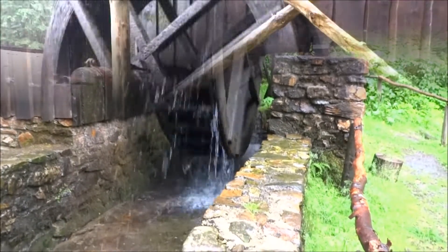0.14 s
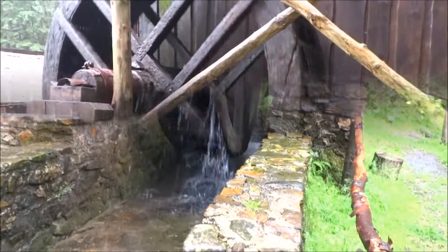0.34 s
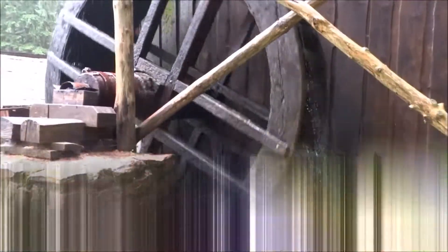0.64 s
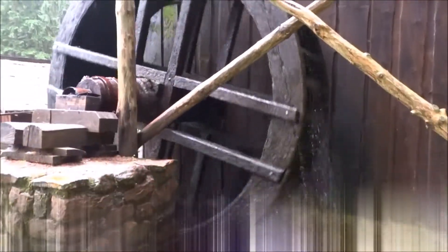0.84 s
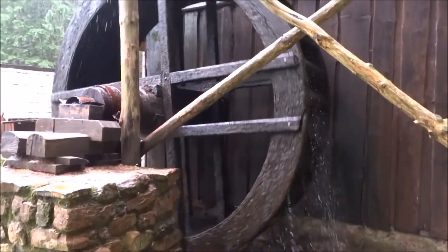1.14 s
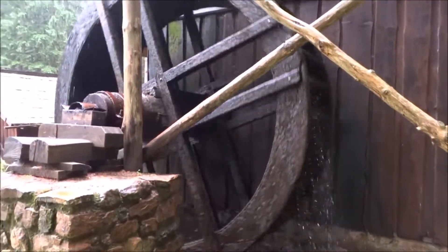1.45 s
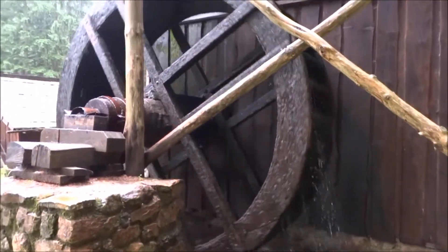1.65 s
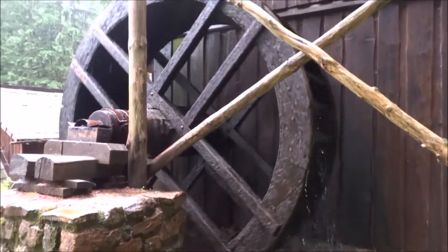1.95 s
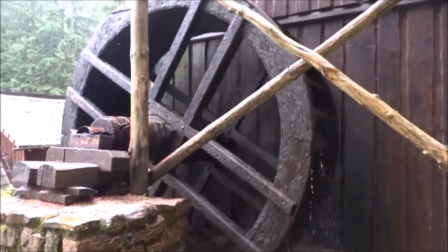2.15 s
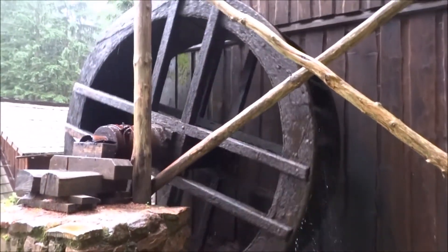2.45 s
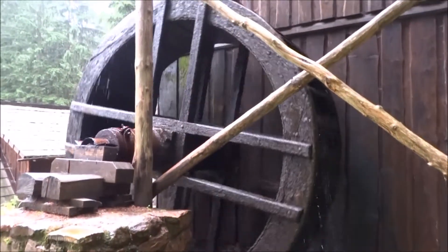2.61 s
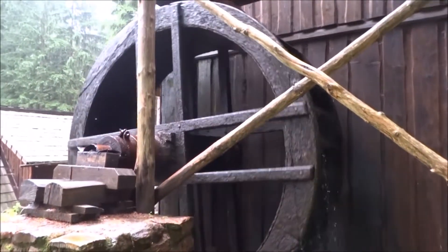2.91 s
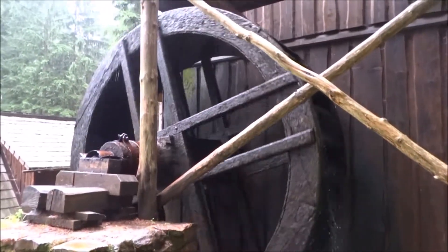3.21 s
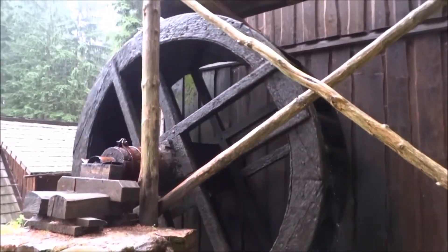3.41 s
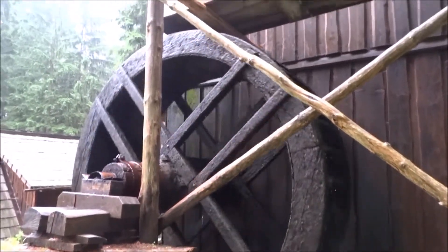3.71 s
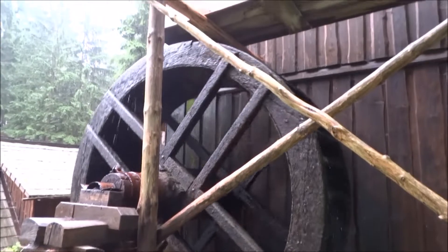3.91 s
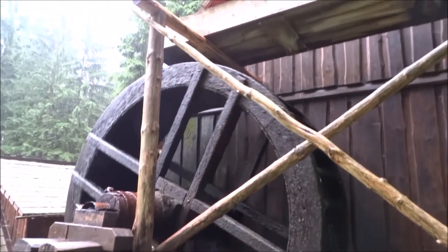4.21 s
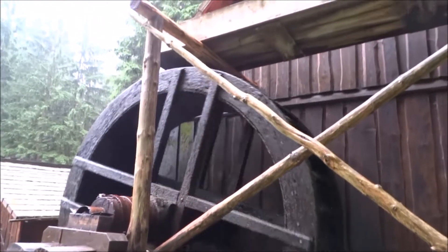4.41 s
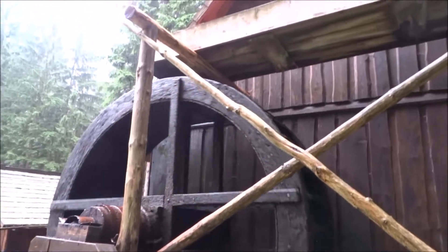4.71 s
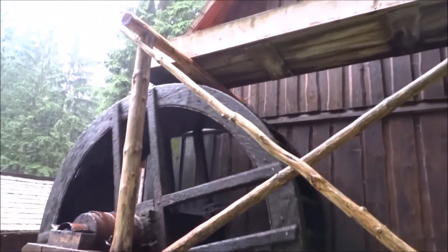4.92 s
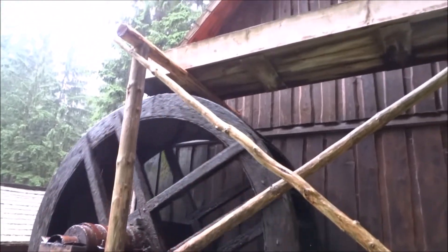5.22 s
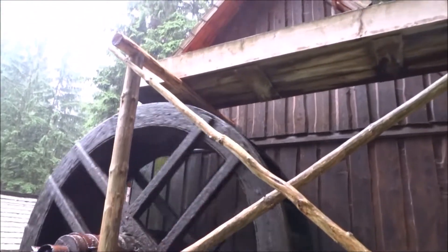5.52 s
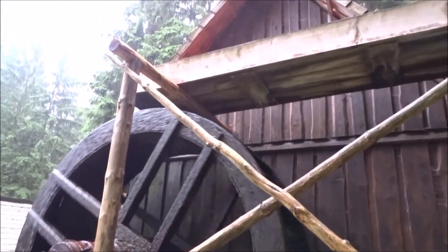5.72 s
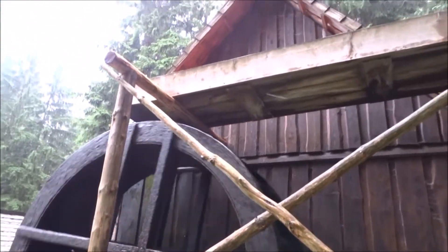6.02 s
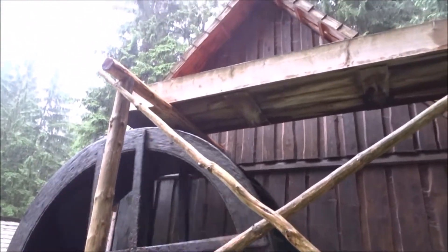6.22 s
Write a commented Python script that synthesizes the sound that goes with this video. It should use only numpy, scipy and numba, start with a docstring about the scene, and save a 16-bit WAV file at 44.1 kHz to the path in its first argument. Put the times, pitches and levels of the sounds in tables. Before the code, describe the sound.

A big wooden water wheel turns outdoors, water pouring off it into a stone channel a few metres from the microphone. Throughout there is a dense, bright rush of foam, drop ticks, trickles and gurgles, mostly central with slight stereo width. From about 0.2 s a heavier second fall fades in with deep rumble and several clear bubble plops, holding until it cuts off near 0.66 s; the rumble tails away after. Low thuds follow around 0.8 and 1.3 s. The flow eases from 1.5 to 3 s, with a high bubble blip at 2.1 s. From 3.5 s it swells in waves, with splashes at 4.2, 4.4 and strongest at 4.6 s, then a rising gulp at 4.76 s. Dull wooden gear thumps run beneath at ten per second, one hard knock near 5.8 s. The sound grows fuller and less crisp, still pouring at the end, 6.35 s.

```python
"""Water spills off the buckets of a big wooden water wheel into a stone race, a few metres away. The fall is
coloured foam noise, drop ticks and bubble clouds; near the start a louder layer of water sound fades in, holds
and cuts off abruptly. Low band noise makes the rumble and thuds; noise bursts and rising sines make the
splashes, bubbles and gulps that stand out. Under the water, wooden gearing thumps about ten times a second:
each tooth rings the damped modes of a timber frame."""
import sys
import numpy as np
from scipy import signal
from scipy.fft import rfft, irfft
from scipy.io import wavfile
from scipy.ndimage import uniform_filter1d
from numba import njit

SR = 44100
rng = np.random.default_rng(int(sys.argv[2]) if len(sys.argv) > 2 else 0)


def unload_wav(signal):
    """Save mono or channel-first audio to the path in sys.argv[1] as 16-bit WAV at rate SR, clipped to [-1, 1]."""
    wavfile.write(
        sys.argv[1],
        SR,
        np.round(np.clip(np.atleast_2d(signal).T, -1, 1) * 32767).astype(np.int16),
    )


N = 280024
T = np.arange(N) / SR  # s
FREQ = np.arange(N // 2 + 1) * SR / N + 1e-3  # Hz, offset so that its log exists


def undb(db):
    """Decibels to gain."""
    return 10 ** (np.asarray(db) / 20)


def unit(x):
    """Scale to rms 1."""
    return x / np.sqrt(np.mean(x ** 2))


def over_hz(points, hz=FREQ):
    """Read (frequency [Hz], value) points on a log-frequency axis."""
    point_hz, value = np.transpose(points)
    return np.interp(np.log(hz), np.log(point_hz), value)


def walk(rate_hz):
    """Random levels held 1 / rate_hz seconds and slewed; rms 1."""
    hold = int(SR / rate_hz)
    offset = rng.integers(hold)
    levels = rng.standard_normal(N // hold + 2)
    held = np.repeat(levels, hold)[offset:][:N]
    return unit(uniform_filter1d(held, hold))


def resonant_noise(centre_hz, width_hz):
    """Noise of rms 1 under a resonance curve, full width at half amplitude."""
    detune = (FREQ - centre_hz) / (width_hz / 2)
    return unit(irfft(rfft(rng.standard_normal(N)) / (1 + detune ** 2), N))


@njit
def ring(start, hz, cycles, size, rise):
    """Decaying sines whose pitch climbs by the share rise as each bubble nears the surface."""
    out = np.zeros(N)
    for k in range(len(start)):
        length = int(cycles[k] / hz[k] * SR)
        step = 2 * np.pi * hz[k] / SR
        z = size[k] + 0j
        turn = np.exp(1j * step - 5 / length)  # amplitude falls to exp(-5) over the length
        bend = np.exp(1j * step * rise[k] / length)
        for i in range(start[k], min(start[k] + length, N)):
            z *= turn
            turn *= bend
            out[i] += z.imag
    return out


def early_swell(attack_s=.13, release_s=.013):
    """Strength, 0 to 1, of an early louder stretch: it fades in, holds and cuts off."""
    start_s, release_start_s = .19, 0.657
    attack = (T - start_s) / attack_s
    release = 1 - (T - release_start_s) / release_s
    return np.clip(np.minimum(attack, release), 0, 1)


def flow():
    """Level in dB of plunge, splash and spray: their slow course plus the early swell."""
    # slow course of the fall: (time [s], plunge [dB], splash [dB], spray [dB])
    fall = [(0, 0.5, 1, 1), (0.18, 0, -0.5, 1), (0.8, -2, -0.5, 1), (1.4, -1.0, 1.0, 1),
            (1.6, -2.5, -2.0, -1.0), (2.22, -2.0, -1.0, -1.0), (2.42, -1.5, 0.5, 1.0),
            (2.9, -2.0, -0.5, -0.5), (3.2, -1, -1.5, 0), (3.5, 1, 0.5, 1.0), (3.9, 2, 1.5, 0.0),
            (4.32, -0.5, -1, -0.5), (4.85, 2, 2.0, 0.5), (5.15, 0, -0.5, -0.5), (5.55, 2.5, 0.0, -1),
            (5.8, 3, 2, 0.5), (6.08, 1.5, -0.5, -0.5), (6.35, 4.5, 2.5, 0.5)]
    # the early swell at full strength adds: (plunge [dB], splash [dB], spray [dB])
    swell_db = (5.5, 4, 3.5)
    s, *courses = np.transpose(fall)
    strength = early_swell()
    return np.array([np.interp(T, s, course) + db * strength for course, db in zip(courses, swell_db)])


def drops(spread_db, count):
    """Sharp ticks of drops striking wet wood and stone; rms 1."""
    when, strength, sign = rng.random((count, 3)).T
    size = undb(-spread_db * np.log(strength + .015)) * np.sign(sign - .5)
    return unit(np.bincount((when * N).astype(int), size, N))


def bubbles(low_hz, high_hz, cycles, spread_db, rise, count):
    """A cloud of bubbles with even energy per Hz: many faint, a few strong."""
    when, pitch, life, strength = rng.random((count, 4)).T
    hz = low_hz * (high_hz / low_hz) ** pitch
    size = np.sqrt(hz) * undb(-spread_db * np.log(strength + .05))
    # high bubbles die sooner, so they start stronger; long-lived ones rise furthest
    start_size = size * np.sqrt(hz)
    cloud = ring((when * N).astype(np.int64), hz, cycles * (.5 + life), start_size, 2 * rise * life)
    return unit(cloud) * np.sqrt((high_hz - low_hz) / (SR / 2))


def churn():
    """Foam hiss, drop ticks, gurgling bubbles, trickles and fine fizz, before any colour."""
    foam = rng.standard_normal(N)
    ticks = undb(-7) * drops(spread_db=4, count=18000)
    gurgle = undb(-2) * bubbles(low_hz=400, high_hz=1500, cycles=40, spread_db=3.6, rise=.18, count=2100)
    trickle = undb(-1.5) * bubbles(low_hz=1500, high_hz=5000, cycles=85, spread_db=3.4, rise=.06, count=8000)
    fizz = undb(-1) * bubbles(low_hz=5000, high_hz=10000, cycles=190, spread_db=3.6, rise=.012, count=12000)
    return unit(foam + ticks + gurgle + trickle + fizz)


def water(flicker_db, clump_db):
    """Plunge, splash and spray swell with the fall; clumps shake all bands, and each flickers alone."""
    # relative colour of the fall, lower part: (frequency [Hz], level [dB per Hz])
    body = [(25, -25), (60, -16), (110, -10), (200, -3), (290, -5.5), (400, -6.5), (600, -5), (800, -2.5),
            (1050, -3.5), (1500, -2), (3000, -0.7), (3900, -2), (4700, -3.5)]
    # relative colour of the fall, upper part: (frequency [Hz], level [dB per Hz])
    spray = [(5700, -1.5), (6500, 0.66), (7500, 3), (8400, -1), (9500, -6.5), (11500, -13), (14000, -21.5),
             (15500, -29.5)]
    # stereo width: (frequency [Hz], side level relative to mid [dB])
    width = [(30, -38), (125, -20), (280, -18), (550, -15.5), (1500, -13.5), (3000, -16), (6000, -22.5),
             (8000, -19), (9000, -14.5), (10300, -6), (11500, -11), (12200, -51)]
    # right channel ahead of left: (frequency [Hz], phase lead [rad])
    right_lead = [(60, 0), (300, 0.12), (780, 0.42), (2000, 0.005), (5000, 0), (15000, 0)]
    # what rules each pitch: (frequency [Hz], plunge [share], splash [share], spray [share])
    part_shares = [(750, 1, 0, 0), (1400, 0, 1, 0), (4000, 0, 1, 0), (6400, 0, 0, 1)]
    # treble tilt, which dulls with time: (time [s], slope above 7 kHz [dB per octave])
    treble = [(0, 4.5), (.6, 3), (1.4, 2), (3, 0.5), (6.35, -1)]
    # random slop of plunge, splash, spray, a row each: (rate [changes per s], spread [dB rms])
    slop = [(10, 0.83), (9, 0.08), (11, 0.42)]
    water_db, swell_narrow_db = -15, 3

    swells = flow() + np.array([db * walk(rate_hz) for rate_hz, db in slop])
    colour = unit(undb(over_hz(body + spray))) * undb(water_db)
    mid = rfft(churn()) * colour
    side = rfft(churn()) * colour * undb(over_hz(width))
    half_lead = np.exp(.5j * over_hz(right_lead))
    ears = np.array([mid / half_lead + side, mid * half_lead - side])

    share_hz, *shares = np.transpose(part_shares)
    tilt = np.interp(T, *np.transpose(treble))
    # while the early swell sounds, the upper bands are narrower in stereo
    narrow = undb(-swell_narrow_db * early_swell())
    clumps = clump_db * walk(45)
    centres_hz = np.geomspace(200, 12800, 13)
    out = 0
    for hz, pick in zip(centres_hz, np.eye(len(centres_hz))):
        window = np.interp(np.log(FREQ), np.log(centres_hz), pick)
        band = irfft(ears * window, N)
        share = np.array([np.interp(hz, share_hz, column) for column in shares])
        middle = band.mean(0)
        band = middle + (band - middle) * (share[0] + (1 - share[0]) * narrow)
        top_db = tilt * max(np.log2(hz / 7000), 0)
        out = out + band * undb(share @ swells + top_db + clumps + flicker_db * walk(22.14))
    return out


def rumble(low_hz, high_hz):
    """The mass of water pounds the floor of the race: low noise, loudest during the early swell, and thuds."""
    # heavy slugs of water: (time [s], peak level [dB])
    slugs = [(.78, -40), (1.3, -42), (3.1, -48), (3.45, -48), (4.41, -43)]
    thud_s = 0.061  # to 1/e either side of the peak
    base_db, load_db_per_db, wander_db, swell_extra_db = -59.5, 1.0, 5, 24
    band = signal.butter(2, [low_hz, high_hz], "band", fs=SR, output="sos")
    noise = signal.sosfilt(band, rng.standard_normal(N))
    swell = early_swell(attack_s=0.29, release_s=.2)
    wander = wander_db * (1 - swell) * walk(6)
    steady = undb(base_db + load_db_per_db * flow()[0] + swell_extra_db * swell + wander)
    thuds = sum(undb(db) * np.exp(-((T - s) / thud_s) ** 2) for s, db in slugs)
    return unit(noise) * (steady + thuds)


def teeth(count):
    """Time and level of each tooth: a pace that lags and catches up, louder under load, some knocks."""
    # the tooth nearest each moment knocks hard: (time [s], peak level [dB])
    knocks = [(.41, -20), (.5, -22), (2.28, -19.5), (3.12, -23.5), (3.5, -24), (3.59, -23.5), (4.09, -22.5),
              (4.18, -22), (4.48, -24), (5.76, -15.5), (5.95, -21), (6.33, -24)]
    first_s, spacing_s, jitter_s = .0296, .0968, .004  # jitter: unevenness from wear
    # the wheel runs slightly fast and slow in turn
    lag_s, lag_peak_s, lag_period_s = 0.01757, 2.23, 3.146
    base_db, scatter_db, load_db_per_db = -28.5, 2.0, .7
    even = first_s + spacing_s * np.arange(count)
    when = even + lag_s * np.cos(2 * np.pi * (even - lag_peak_s) / lag_period_s)
    when = when + jitter_s * rng.standard_normal(count)
    load_db = load_db_per_db * np.interp(when, T, flow()[0])
    db = base_db + load_db + scatter_db * rng.standard_normal(count)
    for s, knock_db in knocks:
        db[np.argmin(np.abs(when - s))] = knock_db
    return zip(when, db)


def gearing(push_s, scatter):
    """Each wooden tooth gives the frame a soft push, and its low modes ring briefly."""
    # modes of the timber frame: (mean frequency [Hz], t60 [s], mean relative level [dB])
    timber = [(134, 0.069, -4), (156.6, 0.12, 8), (182, .13, 1), (210, 0.11, -6), (292.4, 0.14, -4.5)]
    t = T[:SR // 4]
    out = np.zeros(N + len(t))
    hz, t60_s, mode_db = np.transpose(timber)[:, :, None]
    for s, db in teeth(count=66):
        detune, weight = rng.standard_normal((2, len(timber), 1))
        decay = undb(mode_db + 2 * weight - 60 * t / t60_s)
        modes = decay * np.sin(2 * np.pi * hz * (1 + scatter * detune) * t)
        thump = modes.sum(0) * (1 - np.exp(-(t / push_s) ** 2))
        start = np.clip(int(s * SR), 0, N)
        out[start:start + len(t)] += undb(db) * thump / np.abs(thump).max()
    return out[:N]


def stray_bloops(spread_db, count):
    """Lesser bubbles ring out of the pool at random moments."""
    low_hz, high_hz, length_s, rise, mean_db = 481, 2196, 0.083, .06, -23
    when, pitch, strength = rng.random((count, 3)).T
    hz = low_hz * (high_hz / low_hz) ** pitch
    size = undb(mean_db + spread_db * (strength - .5))
    return ring((when * N).astype(np.int64), hz, hz * length_s, size, np.full(count, rise))


def swell_boom():
    """Low noise around 195 Hz that sounds during the early swell."""
    return undb(-31) * resonant_noise(centre_hz=195, width_hz=50) * early_swell()


def bloops():
    """Large bubbles close, ring on one note and rise."""
    # big bubbles: (start [s], pitch [Hz], length [s], pitch rise [share], starting level [dB])
    big_bubbles = [(.22, 800, 0.12, .05, -17), (.313, 815, 0.13, .05, -20), (.358, 510, 0.084, .05, -17.5),
                   (.357, 2130, .1, .02, -15), (1.354, 1036, .1, 0.091, -22), (1.755, 758, .11, .07, -21),
                   (2.098, 2730, 0.055, 0.033, -13), (3.587, 1220, .06, .05, -18),
                   (3.832, 845, 0.072, .07, -19), (4.077, 2770, .065, .04, -15),
                   (5.813, 1580, .06, .05, -18)]
    s, hz, length_s, rise, db = np.transpose(big_bubbles).copy()
    return ring((s * SR).astype(np.int64), hz, hz * length_s, undb(db), rise)


def splashes():
    """A lump of water lands and throws up a short burst of like-sized bubbles."""
    # lumps: (middle [s], centre [Hz], width [Hz], half-length to 1/e^2 [s], rms level at middle [dB])
    lumps = [(0.86, 1900, 600, .03, -24), (3.61, 1300, 250, 0.028, -27), (3.847, 2150, 302, .04, -25),
             (4.23, 3030, 150, 0.022, -20), (4.436, 1570, 300, 0.025, -19),
             (4.625, 1750, 650, 0.028, -16.5), (4.622, 2700, 1400, 0.03, -20), (4.96, 2300, 900, .02, -25),
             (5.277, 1490, 400, .04, -26), (5.657, 3000, 3000, 0.03, -22)]
    out = np.zeros(N)
    for s, hz, width_hz, length_s, db in lumps:
        envelope = np.exp(-2 * ((T - s) / length_s) ** 2)
        out += undb(db) * resonant_noise(hz, width_hz) * envelope
    return out


def gulps():
    """A pocket of air shrinks as it closes: its note swells, sweeps up and fades."""
    # air pockets: (middle [s], pitch there [Hz], peak level [dB])
    pockets = [(4.763, 758, -21), (4.997, 998, -27)]
    half_length_s, octaves_per_s = .024, 23  # half-length to 1/e
    out = np.zeros(N)
    for s, hz, db in pockets:
        near = np.abs(T - s) < 3 * half_length_s
        t = T[near] - s
        phase = 2 * np.pi * np.cumsum(hz * 2 ** (octaves_per_s * t)) / SR
        out[near] += undb(db) * np.exp(-(t / half_length_s) ** 2) * np.sin(phase)
    return out


def scene():
    """Falling water in stereo; single splashes, bubbles, low noise and gearing in the middle."""
    pool = splashes() + bloops() + gulps() + stray_bloops(spread_db=2, count=18)
    low = rumble(low_hz=48, high_hz=190) + swell_boom()
    fall = water(flicker_db=0.28, clump_db=0.19)
    return fall + pool + low + gearing(push_s=0.011, scatter=0.037)


def record(dry):
    """Clip peaks beyond 0.93 of full scale, then cut steeply above 15.6 kHz."""
    top_hz = 15600
    low_pass = signal.ellip(10, .2, 70, top_hz, fs=SR, output="sos")
    return signal.sosfilt(low_pass, np.clip(dry, -.93, .93))


dry = scene()
out = record(dry)
unload_wav(out)
```